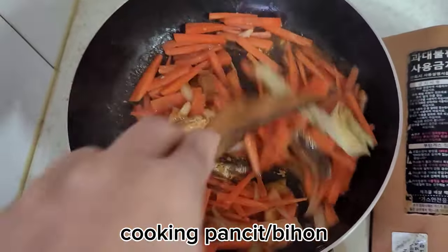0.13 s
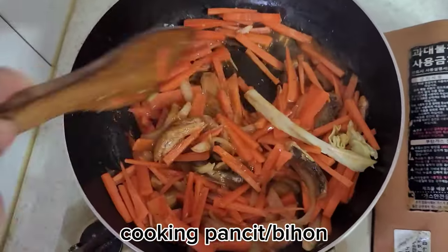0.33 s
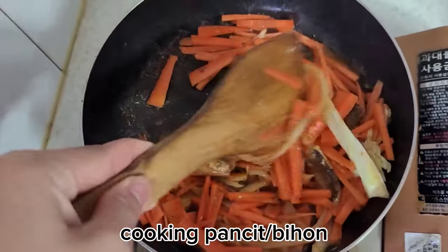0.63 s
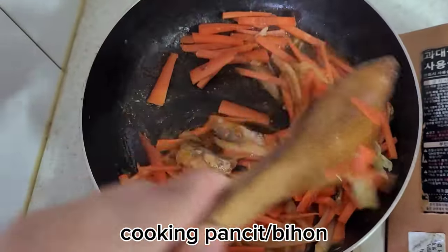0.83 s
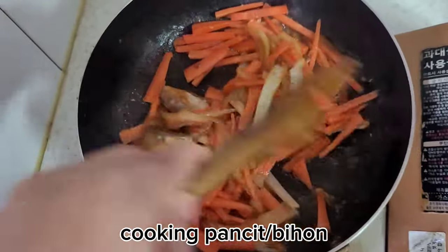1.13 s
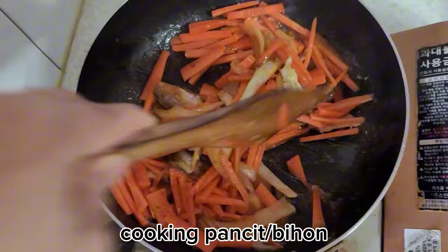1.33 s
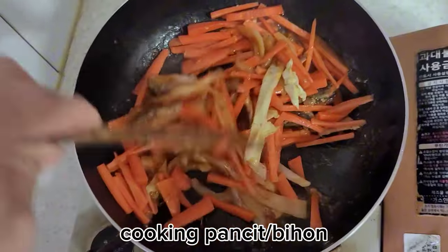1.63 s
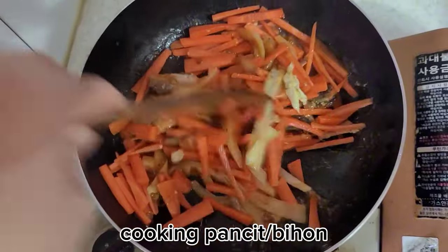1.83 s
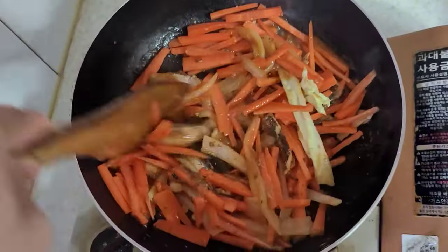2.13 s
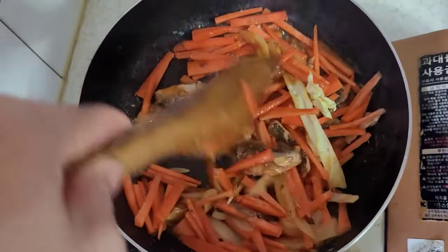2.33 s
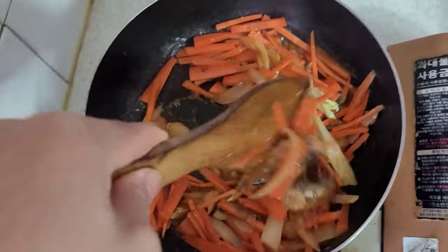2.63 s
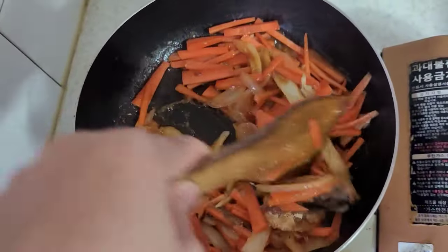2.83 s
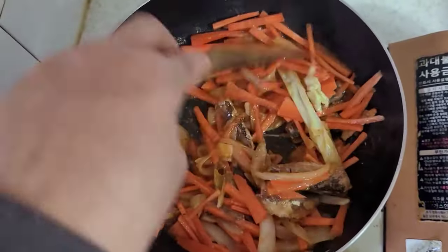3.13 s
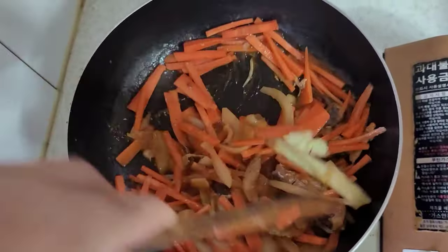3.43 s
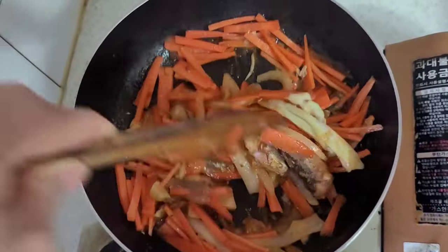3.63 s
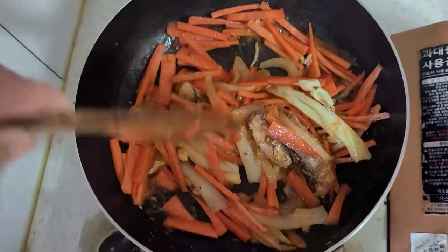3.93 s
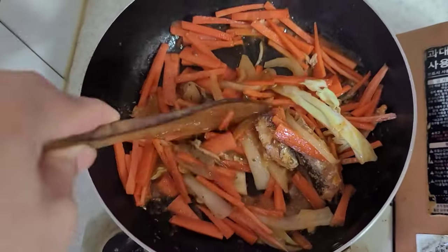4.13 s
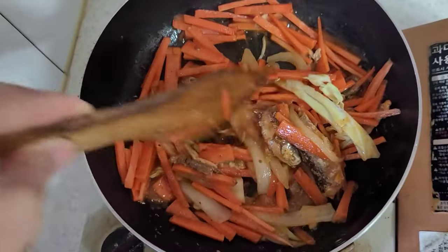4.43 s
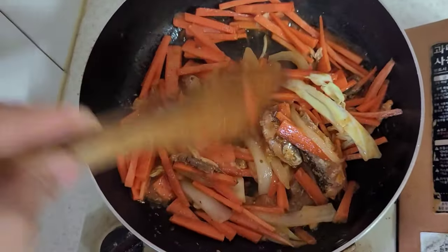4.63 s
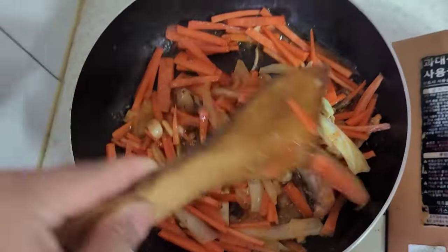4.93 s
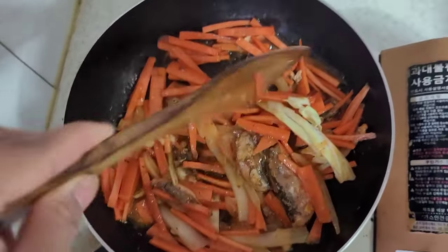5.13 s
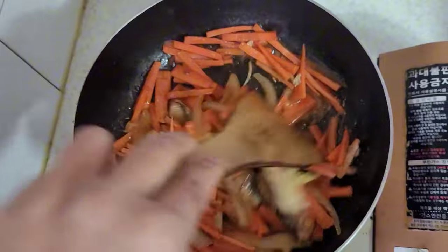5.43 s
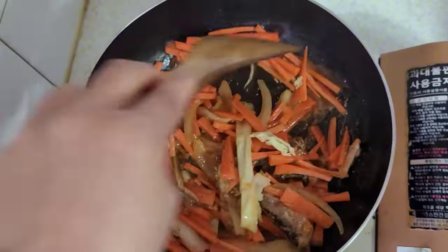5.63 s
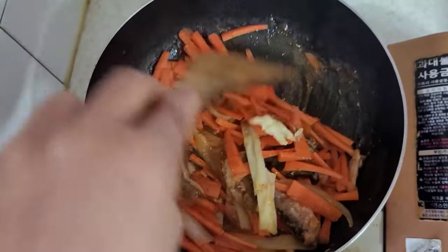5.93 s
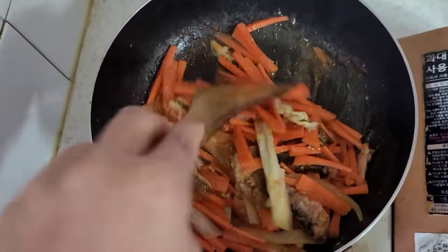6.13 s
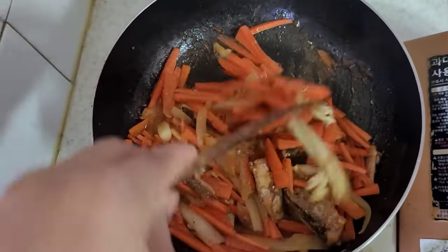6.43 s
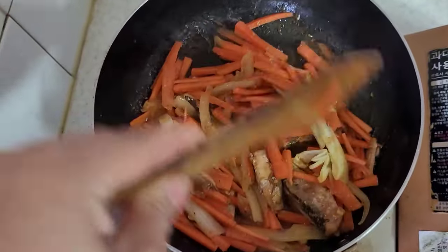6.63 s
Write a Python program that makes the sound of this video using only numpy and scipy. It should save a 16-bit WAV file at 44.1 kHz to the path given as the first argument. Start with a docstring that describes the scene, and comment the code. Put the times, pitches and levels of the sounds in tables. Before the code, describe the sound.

Close above a frying pan in a small kitchen, a wooden spatula rubs and taps as it turns vegetables in hot oil. A few hard, briefly ringing knocks stand out early, then the stirring goes lighter before another strong knock near the end. The tabletop stove thumps dully when jolted. A gentle sizzle with spits and dry crackles runs all the way through, over a faint gas flame.

```python
"""A wooden spatula knocks and scrapes in a coated pan while vegetables fry in oil on a tabletop stove.
Each knock makes the pan ring, each stroke rubs it, and jolts and pushes rock the light stove.
Tiny bursts of steam make the sizzle, with louder spits and dry crackles on top. A gas flame
rushes and hums underneath. Two microphones hang close above the pan in a small kitchen."""
import sys
import numpy as np
from scipy import signal
from scipy.io import wavfile

SR = 44100
rng = np.random.default_rng(int(sys.argv[2]) if len(sys.argv) > 2 else 0)


def int16_out(signal):
    """Quantize to a 16-bit WAV file."""
    q = np.round(np.clip(np.atleast_2d(signal).T, -1, 1) * 32767)
    wavfile.write(sys.argv[1], SR, q.astype(np.int16))


N = 298998

# Tone colour of the gas flame: (frequency [Hz], relative level [dB])
FLAME_SPECTRUM = [(15, -59), (25, 9.5), (159, 5), (189, -14), (216, -18.5), (267, -46), (331, -8),
                  (459, -108), (674, -33), (802, -53), (1160, -31), (1320, -32), (1540, -73), (1910, 2),
                  (2500, -47), (3250, -65), (5500, -120)]
# Tones humming in the flame: (pitch [Hz], width [Hz], level [dB])
HUM_TONES = [(170.1, 4.3, -56), (226.4, 4.2, -75.5), (339.5, 4.2, -74.5)]
# How alike a noise is on the left and right: (frequency [Hz], likeness [higher is more alike])
LIKENESS = [(60, 0.98), (180, 0.97), (550, 1), (1650, 0.47), (4970, -1.4), (15000, -0.37)]
# Steady frying: (time [s], sizzle level [dB], spray level [dB], bright hiss level [dB])
FRYING_LEVELS = [(0.0, -52, -60.5, -65.5), (0.73, -54.5, -61.5, -67), (1.11, -50.5, -60.5, -68),
                 (1.74, -54.5, -61.5, -67), (2.04, -52, -60.5, -61), (2.21, -59, -62, -72),
                 (2.36, -58, -61, -67), (2.57, -56.5, -63, -69.5), (3.12, -63.5, -66, -67),
                 (3.36, -55, -65.5, -65), (3.78, -59, -64, -63), (4.06, -55, -65.5, -65),
                 (5.14, -56.5, -65.5, -61), (5.57, -57, -65.5, -66.5), (6.14, -50, -62.5, -65.5),
                 (6.78, -57.5, -66.5, -65.5)]
# Tone colour of the sizzle: (frequency [Hz], relative level [dB])
SIZZLE_SPECTRUM = [(710, -4.5), (1200, -2), (1350, -3), (1570, -5.5), (1900, -1.5), (2050, -0.5), (2710, 0),
                   (3140, 7), (4550, 3), (5010, 3.5), (6600, -9), (7590, -2.5), (9500, -24), (12400, -64),
                   (20900, -120)]
# Tone colour of the finer spray: (frequency [Hz], relative level [dB])
SPRAY_SPECTRUM = [(5000, -14), (7500, -21), (10400, 3), (13600, -0.5), (16200, -7.5)]
# The sizzle flares as wet food meets hot metal: (time [s], peak level [dB], time to fade to a third [s])
SIZZLE_FLARES = [(0.14, -49, 0.027), (0.38, -45.5, 0.034), (0.43, -47, 0.1), (0.87, -47, 0.038),
                 (0.925, -46, 0.05), (1.02, -52, 0.024), (1.19, -48, 0.052), (1.43, -56, 0.24),
                 (1.829, -47.5, 0.06), (2.09, -48, 0.21), (2.509, -37.5, 0.029), (2.79, -52.5, 0.24),
                 (3.15, -50, 0.17), (3.42, -50.5, 0.059), (3.54, -51, 0.097), (3.78, -48.5, 0.092),
                 (3.92, -53.5, 0.03), (4.07, -50, 0.047), (4.34, -48, 0.023), (4.63, -47, 0.0084),
                 (4.68, -50.5, .03), (5.37, -51, 0.06), (5.55, -53, 0.015), (5.7, -48.5, 0.014),
                 (6.33, -66, .03), (6.42, -51.5, 0.046), (6.66, -48.5, 0.018)]
# The loudest spits of juice in hot oil: (time [s], peak level [dB], pitch [Hz], left over right [dB])
LOUD_SPITS = [(0.434, -34.5, 4320, -10), (0.4564, -42, 8400, -1), (0.62, -40, 3680, -7),
              (0.842, -42, 3560, -6), (1.122, -40, 3850, -3), (1.343, -40, 3800, -6), (1.43, -47, 3810, -4),
              (1.4735, -40.5, 4000, -7), (1.544, -41, 8100, 3), (1.6945, -44, 8300, 2),
              (1.963, -46.5, 4300, -14.5), (2.174, -45, 11200, -6), (2.456, -41, 4380, -3),
              (2.5123, -32, 4770, -11), (2.7546, -45, 8210, -1.5), (3.0001, -43.5, 4400, -9),
              (3.195, -43, 3560, -7), (3.2092, -37, 3440, 7), (3.413, -40, 3970, -4),
              (3.766, -42, 4200, -10), (3.7993, -44, 10300, -6), (3.8392, -44, 10500, -4),
              (3.8955, -44, 5650, 15), (4.115, -43, 4630, 13.5), (4.43, -39, 6400, -8),
              (4.59, -37, 6200, -2), (4.682, -44, 4520, -3), (4.738, -41, 4500, 10.5),
              (4.818, -41, 5500, 13), (5.116, -44, 8260, 8), (5.173, -50, 6450, 3),
              (5.2819, -43.5, 7900, 9), (5.2954, -40, 12400, -.5), (5.575, -40, 14400, -4),
              (5.635, -52, 4380, 0), (5.939, -43, 4470, -10), (6.2776, -46, 8050, 5),
              (6.329, -36.5, 4800, 11.5), (6.4052, -34.5, 5400, 11.5), (6.61, -44, 3880, -4)]
# Bands where the air in the pan rings: (frequency [Hz], width [Hz], level of the added band [dB])
HOLLOW_BANDS = [(4500, 600, -5), (7000, 800, -3)]
# The stove body's natural tones: (pitch [Hz], relative level [dB], time to fade by 60 dB [s])
STOVE_TONES = [(46.4, 5, 0.26), (95.5, 0.5, 0.3), (112.4, -3.5, 0.41), (138.9, 9, 0.44)]
# Jolts passed down into the stove: (time [s], peak level [dB], change to the lowest tone [dB])
STOVE_JOLTS = [(0.009, -26, 1), (0.366, -16.5, -5.5), (0.86, -23.5, -15), (0.923, -23, -7.5),
               (1.181, -21.5, -10), (1.205, -23, -16), (1.453, -30, -14), (1.49, -28.5, -24),
               (1.582, -30, -32), (1.831, -33, -13), (2.085, -22.5, -7.5), (2.466, -18.5, -7.5),
               (2.81, -24.5, -5.5), (3.072, -31.5, -2), (3.427, -37, -19), (3.48, -55, -10),
               (3.781, -32.5, -21), (4.104, -31, -10), (4.332, -32, -2), (4.627, -19.5, -8),
               (5.3, -25.5, -8), (5.635, -24, 0), (5.693, -21, 0.5), (6.012, -27.5, -1), (6.392, -28, -6),
               (6.649, -30.5, -10)]
# The pan's natural tones: (pitch [Hz], relative level [dB], ring time before extra damping [s])
PAN_TONES = [(237, -1, 0.029), (318, 1, 0.096), (418, -3, 0.16), (503, -11, 0.11), (570, -42, 0.18),
             (690, -5, 0.023), (702.6, 11.5, 0.07), (800, -18, 0.28), (868, 6.5, 0.11), (961, 1, 0.091),
             (1066, 5.5, 0.086), (1188, -13.5, 0.057), (1327, 0.5, 0.34), (1337, 13, 0.065),
             (1460, 3, 0.15), (1656, 8, 0.048), (1660, -7, 0.28), (1847, 13, 0.023), (2144, 7.5, 0.057),
             (2404, 7.5, 0.051), (2816, 7, 0.038), (3120, -23, 0.14), (4200, -30, 0.036),
             (4120, -30, 0.055), (4900, -49, 0.031), (6200, -30, .03)]
# Spatula strokes at their strongest: (time [s], push on the stove [dB], rub on the pan [dB])
SPATULA_STROKES = [(0.0, -34.5, -55), (0.4, -51, -45.5), (0.875, -51, -51), (0.93, -33.5, -44),
                   (1.24, -37.5, -43), (1.5, -43, -49), (1.62, -41.5, -58), (1.89, -45, -57),
                   (2.12, -55, -49), (2.5, -44, -49.5), (2.831, -36.5, -53.5), (3.19, -44, -57),
                   (3.491, -38.5, -52), (3.82, -44.5, -56.5), (4.15, -48, -65.5), (4.35, -46.5, -58),
                   (4.65, -47, -62), (5.32, -56, -52), (5.7, -38, -48), (5.85, -51, -56.5),
                   (6.05, -38.5, -54), (6.29, -52.5, -55), (6.67, -41.5, -53)]
# Wood hitting the pan; blade, pan ring and crack are relative to the thud: (time [s], peak level [dB],
# thud pitch [Hz], blade [dB], contact time [ms], pan ring [dB], crack [dB], left over right [dB])
SPATULA_KNOCKS = [(0.112, -40, 1410, -12, 0.31, -3, -4, 3), (0.365, -28, 437, -31, 0.65, -16, -20, 2),
                  (0.859, -29.5, 355, -15, 0.39, 2.5, 2.5, 3), (0.923, -21, 2140, -17, 0.59, -0.5, -1, 2),
                  (1.172, -3.5, 658, -3.5, 0.39, 0, -6.5, 3.5), (1.24, -29.5, 570, -14, 0.5, 11, 9, -6),
                  (1.822, -39.5, 1260, -18, 0.58, 3, -14, 0), (2.086, -14, 643, -29, 0.58, -5, -10.5, 2),
                  (2.468, -8.5, 658, -16.5, .78, -11.5, -32, 2), (2.505, -28, 720, -2, 0.74, 1, -8, 2),
                  (2.53, -25.5, 770, -8, 0.54, -7, -7, -3), (2.822, -30, 760, -14, 0.78, -1, -10, -1),
                  (3.083, -41.5, 240, -16, 0.59, 14, -6, 2), (3.493, -44, 720, -18, .73, 1, -12, -4),
                  (3.801, -36, 1920, -24, 0.41, 3, 5, 6), (4.321, -43.5, 2200, -16, 1, -7, -11, -2),
                  (4.621, -30, 710, -13, .25, 13, -1, 2), (4.855, -46, 337, -25, .47, -21, -12, -8),
                  (5.092, -38, 2230, -25, .35, -19, 6, -5), (5.312, -41, 262, -32, 1, -10, -8, 1),
                  (5.597, -41, 1390, -11, 0.26, 8, -6, -4), (5.695, -9, 626, -3, 0.61, 0, -47, 1),
                  (5.999, -39.5, 560, -6, 0.66, -4, -11, 5), (6.109, -36.5, 253, -9, 0.26, 20, 15, -2),
                  (6.257, -48, 1040, -15, 0.45, 5, -5, 1), (6.288, -36, 2480, -19, 0.44, -8, -1, 1),
                  (6.643, -35.5, 1270, -10, 0.46, 4, -6, 0)]

ONSET_DELAY_SAMPLES = 60   # each knock and jolt sounds this long after its listed time


def from_db(db):
    """Turn decibels into a number to multiply by."""
    return 10 ** (np.asarray(db) / 20)


def rms_one(x):
    """Scale a sound so that its average strength (rms) is 1."""
    return x / np.sqrt(np.mean(x ** 2) + 1e-20)


def peak_one(x):
    """Scale a sound so that its peak is 1."""
    return x / np.abs(x).max()


def at_hz(points, hz):
    """Read a curve at one frequency, with octaves evenly spaced."""
    frequencies, values = np.transpose(points)
    return np.interp(np.log(hz), np.log(np.maximum(frequencies, 1)), values)


def filtered(x, kind, hz, order=2):
    """Keep the "low" part, the "high" part or one "band" of a sound."""
    return signal.sosfilt(signal.butter(order, hz, kind, fs=SR, output="sos"), x)


def drift(rate_hz):
    """A slow random wobble, about 1 in size."""
    step, warm_up = 40, 2000
    r = np.exp(-2 * np.pi * step * rate_hz / SR)
    noise = rng.standard_normal(N // step + warm_up + 2)
    slow = signal.lfilter([1], [1, -2 * r, r * r], noise)[warm_up:]
    return np.interp(np.arange(N) / step, np.arange(len(slow)), rms_one(slow))


def ring(clicks, hz, t60):
    """Each click starts a tone that fades by 60 dB in t60 seconds."""
    r, w = from_db(-60 / (t60 * SR)), 2 * np.pi * hz / SR
    return signal.lfilter([0, np.sin(w)], [1, -2 * r * np.cos(w), r * r], clicks + 1e-18)


def ring_twice(clicks, hz, t60):
    """A tone that swells before it fades."""
    return ring(ring(clicks, hz, t60), hz, t60)


def puff(size, fade_s):
    """Noise that dies away."""
    return rng.standard_normal(size) * np.exp(-np.arange(size) / (max(fade_s, .0003) * SR))


def grains(per_s, spread_db, size):
    """Random clicks, most small, a few large."""
    heights = from_db(spread_db * np.minimum(rng.exponential(1, size), 5)) * rng.choice([-1, 1], size)
    return heights * (rng.random(size) < per_s / SR)


def add(out, start_s, sound, left_db):
    """Mix a sound into both channels, left_db louder on the left."""
    i = round(start_s * SR)
    out[:, i:i + sound.shape[-1]] += sound[..., :N - i] * from_db([[left_db / 2], [-left_db / 2]])


def swells(times, peaks_db, floor_db, rise_db_per_s, fall_db_per_s):
    """A level in dB that climbs above a floor and sinks back around each given time."""
    after_s = np.arange(0, N + 64, 64) / SR - times[:, None]
    humps_db = peaks_db[:, None] + np.minimum(rise_db_per_s * after_s, -fall_db_per_s * after_s)
    power = np.sum(from_db(humps_db) ** 2, axis=0)
    power = np.interp(np.arange(N) / 64, np.arange(len(power)), power)
    return 10 * np.log10(power + from_db(floor_db) ** 2)


def colour(noise_pairs, spectrum, flicker_db, flicker_hz):
    """Shape noise in bands a third of an octave wide, each with its own level, flicker and spread."""
    out, shared_flicker = 0, drift(flicker_hz)
    bottom, top = spectrum[0][0], spectrum[-1][0]
    edges = np.geomspace(bottom, top, round(3 * np.log2(top / bottom)) + 2)
    for k, (low, high) in enumerate(zip(edges, edges[1:])):
        middle, side = filtered(noise_pairs[k % 2], "band", [low, high])
        hz = np.sqrt(low * high)
        alike = np.clip(at_hz(LIKENESS, hz) + 0.14, 0, 1)
        gain = from_db(at_hz(spectrum, hz) + flicker_db * (shared_flicker + drift(flicker_hz)))
        out = out + gain * (np.sqrt(1 + alike) * middle + np.sqrt(1 - alike) * side * [[1], [-1]])
    return rms_one(out)


def kitchen_echo(x, t60=0.29, wall_cutoff_hz=3100, level_db=-16.5):
    """Sound bounces between the walls along eight paths a side, softer and duller on every round."""
    out, dull = np.zeros((2, N)), np.exp(-2 * np.pi * wall_cutoff_hz / SR)
    for k, lag in enumerate((rng.uniform(.008, .03, 16) * SR).astype(int)):
        loop, gain, state = x.copy(), from_db(-60 * lag / SR / t60), [0.]
        for i in range(lag, N, lag):
            echo, state = signal.lfilter([gain * (1 - dull)], [1, -dull], loop[i - lag:i], zi=state)
            loop[i:i + lag] += echo[:N - i]
        out[k % 2] += (loop - x) * (-1) ** (k // 2)
    return from_db(level_db) * out


def burner(flame_db=-53):
    """The gas flame rushes softly, and wavering tones hum in it."""
    noise = rng.standard_normal((2, 2, N))
    out = from_db(flame_db) * colour(noise, FLAME_SPECTRUM, flicker_db=1.33, flicker_hz=3.9)
    for hz, width_hz, db in HUM_TONES:
        out += from_db(db) * rms_one(ring_twice(rng.standard_normal(N), hz, 2.2 / width_hz))
    return out


def sizzle():
    """Thousands of tiny steam bursts a second, with a bright hiss and a finer spray above them."""
    times, *curves = np.transpose(FRYING_LEVELS)
    steady_db, spray_db, hiss_db = [np.interp(np.arange(N) / SR, times, curve) for curve in curves]
    flare_times, peaks_db, fade_s = np.transpose(SIZZLE_FLARES)
    step_db, rise_s = 20 / np.log(10), .02   # one step down leaves about a third of the height
    sizzle_db = swells(flare_times, peaks_db, steady_db, step_db / rise_s, step_db / fade_s[:, None])
    flare_db = sizzle_db - steady_db   # spray and hiss follow each flare a little
    bursts = grains(per_s=9000 * from_db(2 * drift(30)), spread_db=3.23, size=(2, 2, N))
    body = colour(bursts, SIZZLE_SPECTRUM, flicker_db=1.35, flicker_hz=19.6)
    spray = colour(bursts[::-1], SPRAY_SPECTRUM, flicker_db=0.49, flicker_hz=15)
    hiss = rms_one(filtered(bursts[1], "band", (6180, 8000)))
    return (from_db(sizzle_db) * body
            + from_db(spray_db + 0.4 * flare_db) * spray
            + from_db(hiss_db + 0.19 * flare_db + 1.5 * drift(6.4)) * hiss)


def spit(hz, puff_s, ring_cycles):
    """Steam bursts out of a pocket of juice and makes the pocket ring."""
    return peak_one(ring_twice(puff(SR // 20, puff_s), hz, ring_cycles / hz))


def spitting_juice():
    """Juice spits in the hot oil: a few loud drops among hundreds of faint ones."""
    out = np.zeros((2, N))
    for start_s, db, hz, left_db in LOUD_SPITS:
        sound = spit(hz, puff_s=33 / hz, ring_cycles=12 * 4000 / hz)   # small, high pockets ring less
        add(out, start_s, from_db(db) * sound, left_db)
    for when, pitch, quietness, length, side in rng.random((600, 5)):
        db = -54 - 3.2 * np.log(quietness + .02) - 6 * pitch   # small drops are high and faint
        sound = spit(2800 * 3.5 ** pitch, puff_s=0.013 * length, ring_cycles=16.7)
        add(out, when * N / SR, from_db(db) * sound, left_db=16 * (side - .5))
    return out


def oil_crackle(level_db=-67.5):
    """Oil gives dry snaps in clumps, each snap from its own side of the pan."""
    snaps = grains(per_s=110 * from_db(6 * drift(6.4)), spread_db=4.6, size=N)
    left_db = 5.4 * rng.standard_normal(N)
    placed = snaps * from_db(left_db * [[.5], [-.5]])
    smeared = signal.lfilter(puff(SR // 300, fade_s=0.00092), 1, placed)
    return from_db(level_db) * rms_one(filtered(smeared, "high", 4500))


def pan_hollow(x):
    """The air in the hollow of the pan lifts two bands of the frying sound."""
    return x + sum(from_db(db) * signal.lfilter(*signal.iirpeak(hz, hz / width_hz, fs=SR), x)
                   for hz, width_hz, db in HOLLOW_BANDS)


def stove_rocking():
    """The light stove rocks at a few low pitches when it is jolted or a stroke pushes it."""
    out, click = np.zeros((2, N)), np.eye(1, SR // 2, ONSET_DELAY_SAMPLES)[0]
    r = np.exp(-2 * np.pi * 160 / SR)   # rubber feet spread a jolt over a few milliseconds
    shove = signal.lfilter([(1 - r) ** 2], [1, -2 * r, r * r], click)
    for start_s, peak_db, lowest_db in STOVE_JOLTS:
        changes_db = [lowest_db, 0, 0, -14]   # one for each tone, low to high
        thump = sum(from_db(db + change) * ring(shove, hz, t60)
                    for change, (hz, db, t60) in zip(changes_db, STOVE_TONES))
        add(out, start_s, -from_db(peak_db) * peak_one(thump), left_db=-.4)
    times, peaks_db, _ = np.transpose(SPATULA_STROKES)
    push_db = swells(times, peaks_db, floor_db=-61.5, rise_db_per_s=146, fall_db_per_s=131)
    push = rng.standard_normal(N)
    rumble = sum(ring(push, hz, t60) for hz, _, t60 in STOVE_TONES)
    return out + from_db(push_db) * rms_one(rumble)


def spatula_scrapes():
    """The wooden edge makes many tiny slips that ring the pan; the food cuts the ringing short."""
    times, _, peaks_db = np.transpose(SPATULA_STROKES)
    # The edge bites fast, then drags, and the hand never quite lets go.
    rub_db = swells(times, peaks_db, floor_db=-63, rise_db_per_s=189, fall_db_per_s=85)
    middle, side = grains(per_s=2500 * from_db(4 * drift(20)), spread_db=4, size=(2, N))
    slips = np.array([middle + 0.53 * side, middle - 1.04 * side])
    ringing = sum(from_db(db) * ring(slips, hz, t60=.025) for hz, db, _ in PAN_TONES if hz < 3000)
    return from_db(rub_db) * rms_one(ringing)


def pan_ring(force):
    """A blow sets all the pan's tones ringing; the higher ones reach the two sides unevenly."""
    out = 0
    for k, (hz, db, t60) in enumerate(PAN_TONES):
        touch, tilt = rng.standard_normal(2)
        lean = min(hz / 1500, 1.2) * tilt
        sides = np.array([[1 + lean], [1 - lean]]) / np.hypot(1, lean)
        tone = ring(force, hz, t60 / (1 + hz / 2500))
        out = out + sides * (-1) ** k * from_db(db + 1.5 * touch) * tone
    return out


def spatula_knocks(blade_hz=1339, snap_db=-22):
    """Wood hits the pan: a short thud, a tone from the bending blade, a ringing pan and a sharp crack."""
    out, size = np.zeros((2, N)), SR // 3
    click = np.eye(1, size, ONSET_DELAY_SAMPLES)[0]
    blade = peak_one(ring_twice(click, blade_hz, t60=0.015))
    muffle = 0.24 + 0.98 * np.exp(-np.arange(size) / (0.054 * SR))   # wood and food press on the pan
    for start_s, db, thud_hz, blade_db, contact_ms, ring_db, crack_db, left_db in SPATULA_KNOCKS:
        # The blade skids after each blow: flat blows thud, edge-on ones skid more and grate.
        skid = from_db(-21.5 + 0.075 * crack_db) * np.roll(puff(size, fade_s=.013), ONSET_DELAY_SAMPLES)
        grit = click + skid * (thud_hz / 1200) ** 2
        thud = ring_twice(grit, thud_hz, t60=6.7 / thud_hz)
        ringing = pan_ring(click + skid)
        soft_ring = filtered(ringing, "low", 1000 / contact_ms, order=4)   # longer contact is duller
        crack_noise = np.roll([puff(size, 0.0098), puff(size, 0.013)], ONSET_DELAY_SAMPLES, axis=1)
        crack = filtered(0.32 * peak_one(ringing) + crack_noise, "band", [2600, 5000])
        snap_noise = np.roll(puff(size + 2, fade_s=0.0027), ONSET_DELAY_SAMPLES)
        snap = np.diff(snap_noise, 2)   # keeps mostly the treble
        sound = (peak_one(thud) + from_db(blade_db) * blade
                 + from_db(ring_db) * peak_one(muffle * soft_ring)
                 + from_db(crack_db) * (peak_one(crack) + from_db(snap_db) * peak_one(snap)))
        add(out, start_s, -from_db(db) * peak_one(sound), left_db)
    return out


def scene():
    """Mix the sounds of the pan with the echo of the knocks, the stove and the burner."""
    knocks = spatula_knocks()
    pan = knocks + spatula_scrapes() + pan_hollow(sizzle() + spitting_juice() + oil_crackle())
    pan[1] = np.roll(pan[1], 4)   # the right microphone hears the pan 4 samples later
    return pan + kitchen_echo(knocks.mean(axis=0)) + stove_rocking() + burner()


def record(dry):
    """The small microphones lose the deepest bass, and the highest treble is cut off."""
    thin = filtered(dry, "high", hz=39.8, order=4)
    return signal.sosfilt(signal.cheby2(20, 60, 16450, fs=SR, output="sos"), thin)


dry = scene()
out = record(dry)
int16_out(out)
```